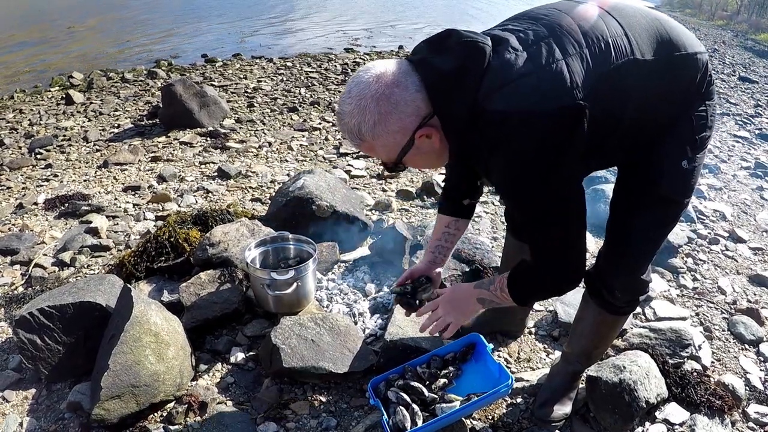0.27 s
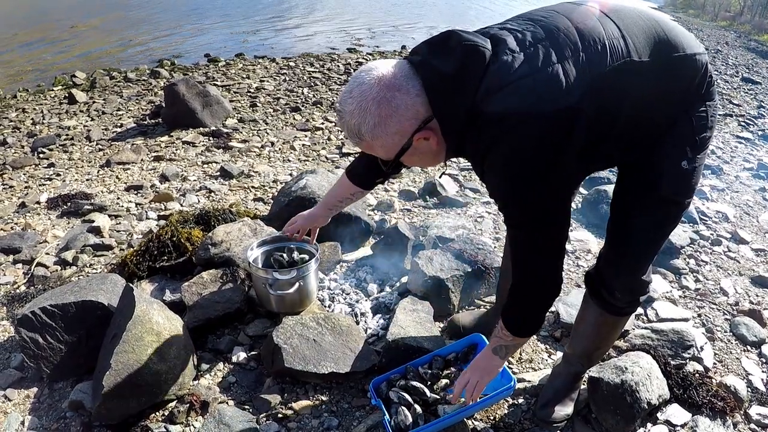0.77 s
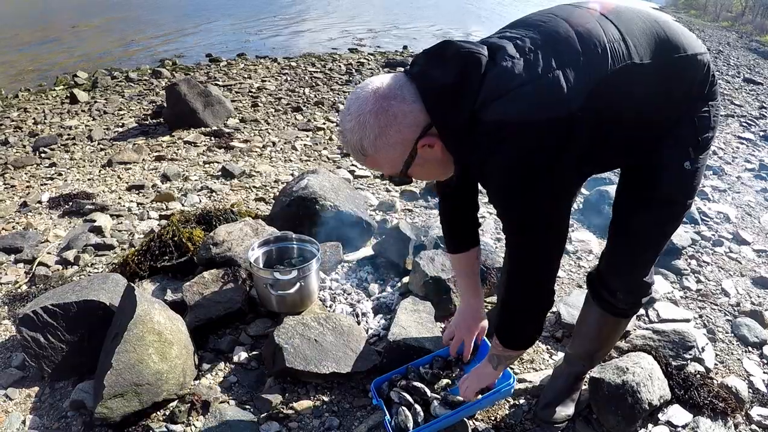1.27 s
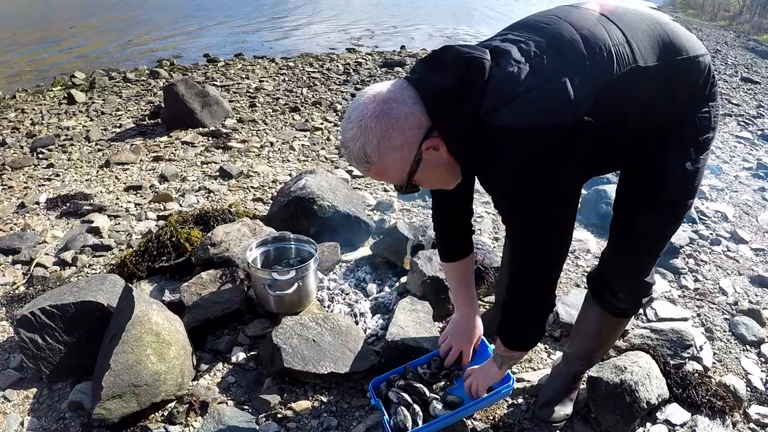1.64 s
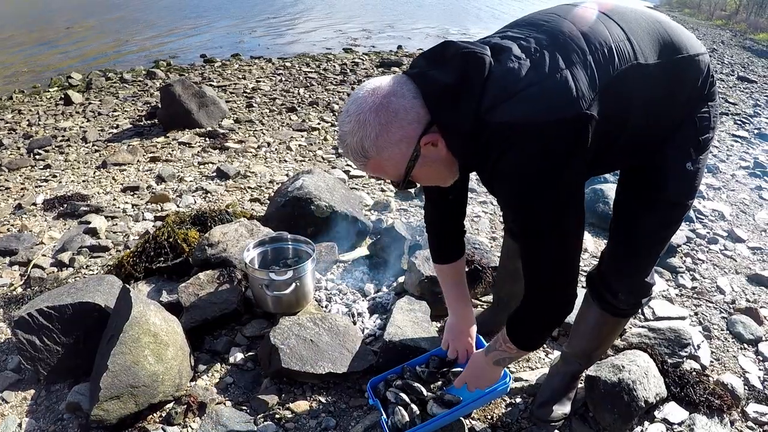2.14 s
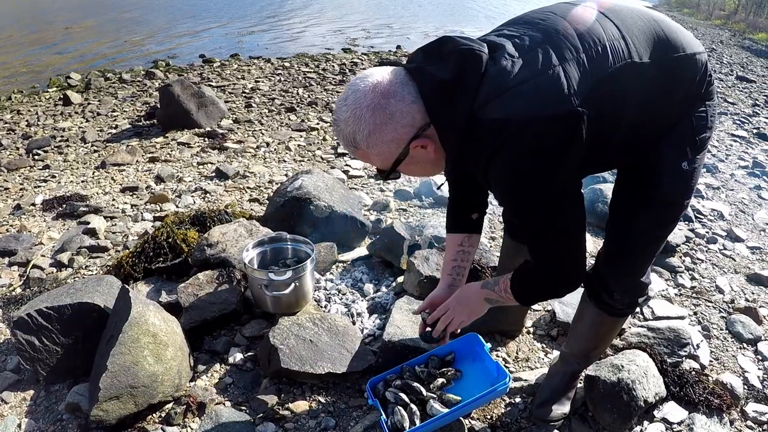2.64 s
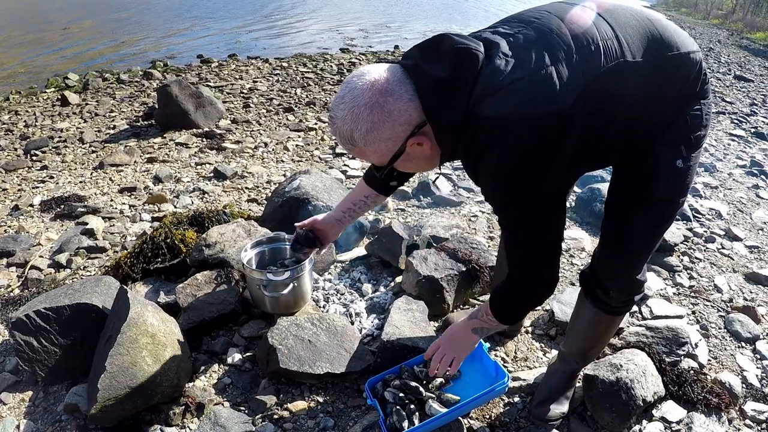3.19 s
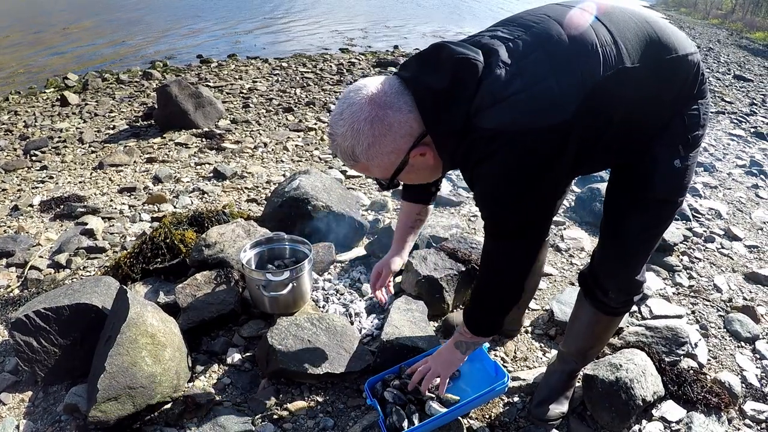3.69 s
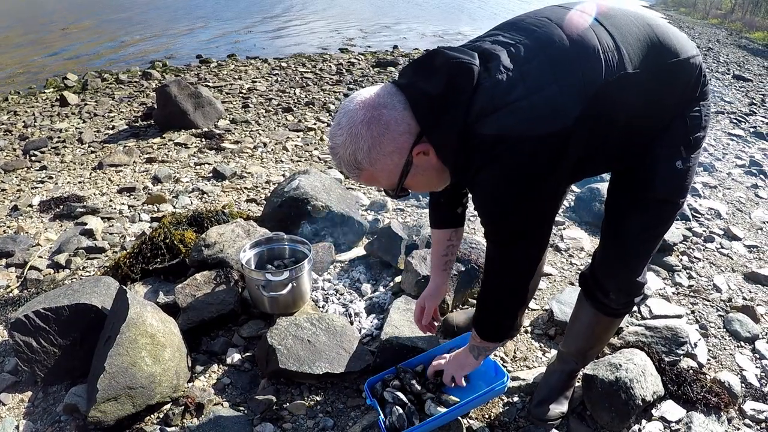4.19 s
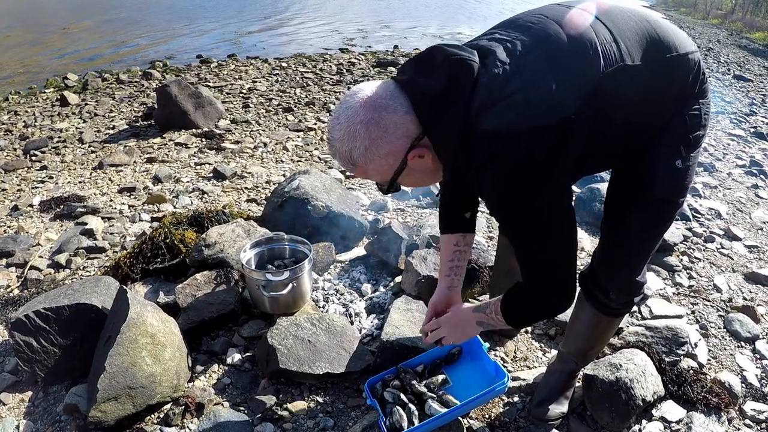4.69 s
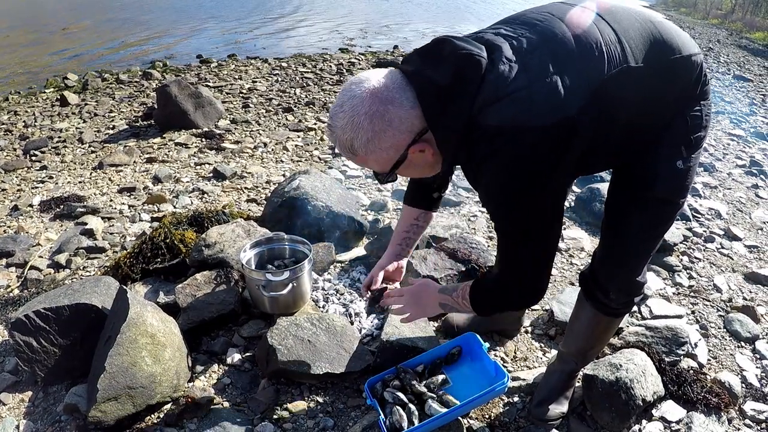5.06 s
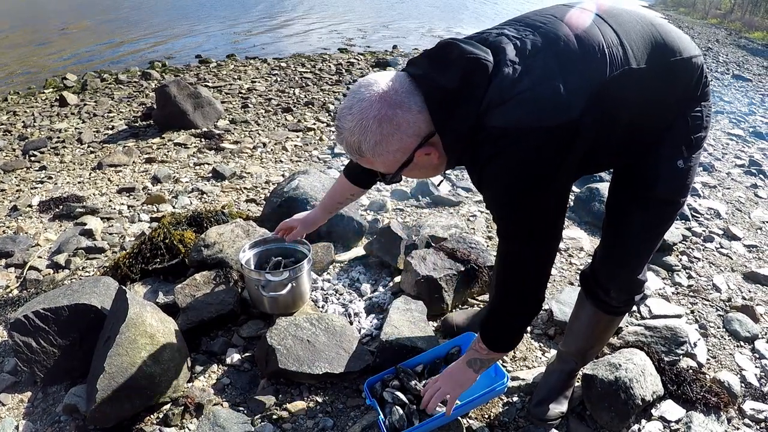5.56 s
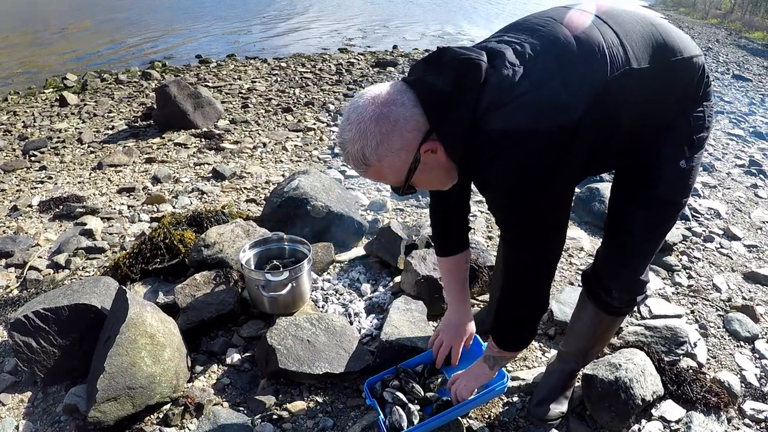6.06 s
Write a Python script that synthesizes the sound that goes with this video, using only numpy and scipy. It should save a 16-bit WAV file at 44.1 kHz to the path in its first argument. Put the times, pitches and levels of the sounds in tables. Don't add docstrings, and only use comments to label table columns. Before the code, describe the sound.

Mussel shells knock in a plastic tray and drop in three clattering bursts into a metal pot, over dying wind and a distant engine hum.

```python
import sys
import numpy as np
from scipy import signal
from scipy.fft import rfft, irfft, next_fast_len
from scipy.io import wavfile
from scipy.ndimage import uniform_filter1d

SR = 44100
rng = np.random.default_rng(int(sys.argv[2]) if len(sys.argv) > 2 else 0)


def master(y):
    cut = np.clip(np.atleast_2d(y).T, -1, 1)
    pcm = np.round(cut * 32767)
    wavfile.write(sys.argv[1], SR, pcm.astype(np.int16))


def boost(x):
    u = np.asarray(x, float) / 20
    return 10 ** u


N = 279153
T = np.arange(N) / SR
SIZE = next_fast_len(N)
HZ = np.maximum(np.fft.rfftfreq(SIZE, 1 / SR), 1)

# pitch_hz, left_lead_rad / pitch_hz, left_minus_right_db
POT_PHASE = [(300, 2), (1030, 0.76), (1380, 1.5), (1900, -1.9), (2400, -0.8), (3100, -0.84), (4800, 0.7),
             (6200, 0.5), (7600, 1.5), (8950, -2), (10300, 1.5)]
POT_BALANCE = [(500, -2), (1030, 3), (1380, -1.5), (1900, 14.5), (2400, 6), (3100, -1), (4800, 0),
               (6200, 7.5), (9000, -2.5), (10300, -17), (12000, 0)]
# pitch_hz, left_lead_rad / pitch_hz, left_minus_right_db
TRAY_PHASE = [(690, -0.13), (1030, 0.94), (1900, 0.13), (2400, -0.88), (3800, -0.42), (6200, -0.41),
              (9000, -1.4)]
TRAY_BALANCE = [(350, -1.5), (1030, -3.5), (1900, 2), (2400, 0.5), (3100, -5.5), (4800, -2), (6200, 5),
                (10000, -10)]
# pitch_hz, level_db, t60_s
TRAY_MODES = [(356, -6.5, 0.025), (550, -6.5, 0.21), (674, 1, 0.031), (796, 4.5, 0.018), (1134, 6.5, 0.021),
              (1250, 2, 0.011), (1750, -3.5, 0.029), (2220, -22, 0.017)]


def along(table, hz=HZ):
    table = np.array(table)
    return np.interp(np.log(hz), np.log(np.maximum(table[:, 0], 1)), table[:, 1])


def columns(table):
    s, *rest = np.transpose(table)
    return [np.interp(T, s, c) for c in rest]


def unit(x):
    return x / np.sqrt(np.mean(x ** 2))


def peak(x, db):
    return boost(db) * x / np.abs(x).max()


def shaped(x, gain):
    return irfft(rfft(x, SIZE) * gain, SIZE)[..., :N]


def coloured(table):
    return unit(shaped(rng.standard_normal(N), boost(along(table))))


def walk(rate):
    k = int(SR / rate)
    steps = np.repeat(rng.standard_normal(N // k + 1), k)
    return unit(uniform_filter1d(uniform_filter1d(steps, k), k)[:N])


def fading(t60, size):
    return np.exp(-np.log(1000) * T[:size] / max(t60, .003))


def swell(s, rise, fall, edge_db):
    distance = np.maximum((s - T) / rise, (T - s) / fall)
    return np.exp(edge_db * np.log(10) / 20 * distance)


def ring(modes, chance, scatter_db=3., damping=1.):
    detune = .016
    hz, db, t60 = np.transpose(modes)[:, :, None]
    t = T[:int(SR * t60.max() / damping)]
    size = boost(db + scatter_db * chance[:len(modes), None])
    hz = hz * (1 + detune * chance[::-1][:len(modes), None])
    decay = np.exp(-np.log(1000) * damping * t / t60)
    return np.sum(size * decay * np.sin(2 * np.pi * hz * t), axis=0)


def clatter(t60, chance, first=1.5):
    return np.r_[first * 10, chance[1:] ** 3] * fading(t60, size=len(chance))


def add(track, s, sound):
    i = int(s * SR)
    track[i:i + len(sound)] += sound[:N - i]


def ports(x, phase, balance, spread):
    half = np.exp(.5j * along(phase)) * boost(along(balance) / 2)
    pair = shaped(x, np.array([half, 1 / half]))
    tail = rng.standard_normal((2, 1500)) * np.exp(-T[:1500] / 0.0054)
    return pair + spread * signal.fftconvolve(x[None], tail, axes=1)[:, :N]


def wind():
    # time_s, steady_strength_db
    dying_down = [(0, -29.5), (1.2, -23), (2.4, -34.5), (3.4, -31.5), (4.3, -37), (5.2, -43.5),
                  (5.8, -47.5), (6.33, -53)]
    # pitch_hz, level_db
    rumble_colour = [(15, -7), (30, 3.5), (60, 4), (100, 3), (150, -9), (250, -52), (1000, -110)]
    buffet_colour = [(30, -33), (60, -7.5), (110, 0), (180, -2.5), (300, -11), (450, -20.5), (700, -29.5),
                     (1200, -51), (4000, -110)]
    # peak_s, length_s, rumble_db, buffet_db, left_minus_right_db
    gusts = [(0.061, 0.18, -44, -13.5, -2), (0.127, 0.062, -15.5, -12.5, 0), (0.317, 0.054, -20, -21, 19),
             (.45, 0.33, -29, -26, 8.5), (0.647, 0.11, -16.5, -19.5, 11), (0.766, 0.24, -30, -40, -7),
             (0.921, 0.091, -19.5, -9.5, 5), (1.012, 0.17, -17.5, -19, 5), (1.118, 0.11, -20.5, -12, 5),
             (1.214, 0.19, -41, -18, 9), (1.333, 0.2, -27, -13, 6), (1.625, 0.064, -16.5, -31, 1),
             (1.824, 0.12, -17.5, -22.5, -1.5), (1.982, 0.1, -18.5, -24, 4),
             (2.173, 0.21, -23, -24.5, -3.5), (2.292, 0.13, -24.5, -31, 12.5), (2.388, 0.019, -25, -26, 14),
             (1.714, 0.15, -32, -22.5, -2.5), (5.95, 0.38, -53, -38.5, -5), (2.53, 0.093, -26, -54, 12.5),
             (3.682, 0.08, -27, -32.5, 10), (4.643, 0.014, -23, -42, -15.5)]
    # pitch_hz, share
    cross = [(100, 0.012), (200, 0.079), (350, 0.16), (520, 0.36), (700, 0.29)]
    steady_db, = columns(dying_down)
    steady_buffet_db = -37.5 + 0.23 * (steady_db + 19.0)
    gust_edge_db = -15.5
    out = []
    for side in (1, -1):
        low, high = boost(2 * steady_db), boost(2 * steady_buffet_db)
        for s, length, low_db, high_db, pan_db in gusts:
            power = boost(side * pan_db) * swell(s, length, length, 2 * gust_edge_db)
            low = low + boost(2 * low_db) * power
            high = high + boost(2 * high_db) * power
        rumble = coloured(rumble_colour) * np.sqrt(low) * boost(1.5 * walk(14) + 4.5)
        buffet = coloured(buffet_colour) * np.sqrt(high) * boost(3.71 * walk(30) + 0.08)
        out.append(rumble + buffet)
    return np.array(out) - shaped(np.array(out[::-1]), along(cross))


def engine():
    # time_s, twice_firing_rate_hz, level_db
    running = [(0, 118.7, -26), (1.5, 119.6, -33), (2.5, 118.6, -31.5), (3.6, 119, -33), (4.2, 119.9, -35),
               (4.6, 120.8, -37), (5.2, 120.1, -38.5), (5.7, 121.3, -43.5), (6.33, 120.8, -49)]
    # multiple, level_db
    orders = [(1, -2.5), (2, 1), (2.5, -13.5), (3, -6), (4, -9), (5, -23.5), (6, -34)]
    hz, db = columns(running)
    turn = np.pi * np.cumsum(hz) / SR
    lead = np.array([[.05], [-.05]])
    out = 0
    for k, order_db in orders:
        level = boost(db + 3.0 + order_db + 0.78 * walk(6.2))
        out = out + level * np.sin(k * (turn + lead) + 0.33 * k * k)
    return out


def shore():
    # time_s, level_db
    wash = [(0, -50), (.2, -52.5), (.45, -48), (.8, -49.5), (1.3, -59.5), (1.7, -57), (2.0, -54.5),
            (2.3, -57.5), (2.6, -59.5), (4.0, -60), (5.3, -63.5), (5.8, -60.5), (6.33, -62)]
    # pitch_hz, level_db
    lapping = [(200, -25), (400, -2), (800, 1), (1400, -3), (2200, -12), (4000, -19.5), (9000, -88)]
    hiss = [(880, -29), (1500, -28), (1700, -1.5), (1830, -1), (2040, -13), (2200, -9.5), (3510, -11),
            (4370, -4.5), (5290, -8.5), (7190, -2), (7910, -7.5), (9300, -7), (10400, -14.5), (11300, -41),
            (13500, -34), (14700, -49)]
    # pitch_hz, level_db
    whines = [(4597, -85), (8629, -81.5)]
    # pitch_hz, correlation
    likeness = [(300, 0.045), (630, -0.34), (1400, -0.12), (3000, 0.45), (8000, -0.22)]
    wash_db, = columns(wash)
    lapping_db = -50.5 + 0.54 * (wash_db + 57.0)
    like = np.clip(along(likeness), -.95, .95)
    out = sum(boost(db + 11 + 1.0 * walk(8.9)) * np.sin(2 * np.pi * hz * T) for hz, db in whines)
    for colour, db in ((lapping, lapping_db), (hiss, wash_db)):
        mid = shaped(coloured(colour), np.sqrt(1 + like))
        side = shaped(coloured(colour), np.sqrt(1 - like))
        pair = np.array([mid + side, mid - side]) / np.sqrt(2)
        out = out + boost(db + 2.5 + 0.18 * walk(24)) * pair
    return out


def capsule_noise():
    # pitch_hz, level_db
    noise_colour = [(3000, -18), (7000, -2), (10500, 7), (13500, -3), (15000, -13)]
    return boost(-66.5) * np.array([coloured(noise_colour), coloured(noise_colour)])


def landings():
    # start_s, peak_db, low_ring_db, crack_db, clatter_t60_s
    shell_drops = [(0.822, -11.5, -3, -7, 0.26), (0.8416, -11.5, -21, -3.5, 0.073),
                   (1.0165, -24.5, -8, -11, 0.28), (1.1113, -39, 4, -2, 0.015),
                   (3.3595, -11.5, -9, -6, 0.11), (3.394, -18.5, 0, -3, 0.063),
                   (3.5014, -23.5, -11, -31, 0.06), (3.5476, -9, -26, -27, 0.021),
                   (3.5803, -35.5, 12, -30, 0.016), (5.5246, -14, -12, -8.5, 0.13),
                   (5.5313, -14.5, -30, 1, 0.021), (5.5688, -20, -6.5, -27, 0.1),
                   (5.593, -16.5, -4, -5, 0.12),
                   (.828, -15.5, 1, -5.5, 0.19), (0.8568, -20.5, 2.5, -26, 0.15),
                  (0.8716, -15.5, -6.5, -23, 0.26), (0.8865, -20.5, 0, -14, .048),
                  (.9552, -25, -9, -20, 0.27), (0.9788, -26.5, -2, -1.5, 0.22),
                  (3.3128, -32.5, -22, -0.5, 0.013), (3.4111, -25, 4.5, -23, 0.055),
                  (3.4176, -11.5, -10, -0.5, 0.15), (3.4426, -30, -29, 0, 0.16),
                  (3.473, -14, -20, -13.5, 0.03), (3.6128, -21.5, -7, -4.5, 0.092),
                  (3.6394, -28, -12, -16.5, 0.11), (3.6586, -31, -4, -31, 0.062),
                  (5.65, -33.5, 1, -27, 0.05)]
    # pitch_hz, level_db, t60_s
    pot_low = [(399, -16, 0.19), (597.6, -14, 0.16), (990, -6, 0.096), (1050, 1, 0.028),
               (1250, -21.5, 0.016), (1506, -3, 0.022)]
    pot_high = [(1720, -12, 0.018), (1980, -1, 0.03), (2800, -11, .022), (2470, 9, 0.062), (2510, 9, 0.075),
                (2940, -14, 0.029), (3510, -4, 0.05), (3730, 5, 0.053), (3990, -22, 0.051),
                (4310, -33, .03), (4930, -35, .08), (6300, -21, 0.02)]
    # pitch_hz, level_db
    crack_colour = [(600, -0.5), (1500, 2.5), (2700, 1), (3800, 5), (5200, -2.5), (6500, 2), (9000, -10),
                    (11000, -12.5), (14000, -27), (16000, -64)]
    out, crack = np.zeros(N), coloured(crack_colour)
    drops = shell_drops
    spots = rng.standard_normal((len(drops), 3, 24))
    showers = rng.standard_normal((len(drops), 6000))
    places = rng.random((len(drops), 24))
    for (s, db, low_db, crack_db, t60), spot, place, shower in zip(drops, spots, places, showers):
        contacts = clatter(0.79 * t60, shower)
        damping = max((0.046 / max(t60, .01)) ** 0.29, .95)
        shell_hz = 900 * (6800 / 900) ** ((np.arange(24) + place) / 24)
        shell = np.c_[shell_hz, along(crack_colour, shell_hz), np.full(24, .013)]
        # modes, spot, scatter between hits in dB, extra damping, level in dB
        bodies = ((pot_low, spot[0], 1.6, 1, low_db - 1.5),
                  (pot_high, spot[1], 5.5, 1.4, -15.5),
                  (shell, spot[2], 4., 1, -3.5))
        for modes, chance, scatter_db, slack, below_db in bodies:
            response = ring(modes, chance, scatter_db, slack * damping)
            add(out, s, peak(signal.fftconvolve(response, contacts), db + below_db))
        i = int(s * SR)
        grit = np.abs(uniform_filter1d(np.abs(contacts), size=60)) ** 0.99
        add(out, s, peak(crack[i:i + 6000] * grit, db + crack_db + 1.5))
    return out


def wall_rings():
    # start_s, peak_db, pitch_hz, t60_s
    rings = [(.843, -23.5, 2350, 0.12), (.862, -25, 3580, .05), (.886, -25, 3510, 0.15),
             (.981, -38, 3480, 0.11), (1.018, -32.5, 2485, 0.28), (1.016, -32, 3830, 0.34),
             (1.015, -32.5, 4550, .06), (3.36, -12.5, 2470, 0.017), (3.364, -14, 1016, 0.038),
             (3.395, -22, 2430, .12), (3.396, -21.5, 1497, .14), (3.396, -27, 3930, 0.066),
             (3.418, -21, 3510, 0.17), (3.42, -26.5, 4110, 0.27), (3.472, -20.5, 3940, 0.03),
             (3.478, -32.5, 1990, 0.17), (3.495, -44.5, 4920, 0.3), (3.615, -32.5, 990, 0.29),
             (3.422, -25.5, 2510, 0.16), (5.596, -24, 990, 0.11), (3.548, -20, 1250, 0.013),
             (3.615, -26.5, 3490, 0.13), (3.617, -30, 3990, 0.13), (5.531, -15.5, 3100, 0.011),
             (5.532, -16, 4580, 0.013), (5.595, -26, 2393, 0.057), (5.599, -25.5, 1493, 0.062),
             (5.595, -32, 3740, 0.24)]
    out = np.zeros(N)
    for (s, db, hz, t60), shower in zip(rings, rng.standard_normal((len(rings), 6000))):
        free_t60 = min(t60, .055)
        pair = ring([(hz, 0, free_t60), (1.018 * hz, -8, free_t60)], np.zeros(2))
        rubbing = clatter(t60, np.cbrt(shower) * np.abs(shower) ** 0.083, 0.28)
        add(out, s, peak(signal.fftconvolve(pair, rubbing), db - 1.0))
    return out


def pot():
    return ports(landings() + wall_rings(), POT_PHASE, POT_BALANCE, 0.027)


def slides():
    # start_s, rms_db, t60_s
    rushes = [(0.826, -29, 0.27), (0.982, -43, 0.14), (1.016, -44, .2), (3.361, -43, .1),
              (3.394, -33.5, .2), (3.42, -31, 0.26), (3.473, -41, 0.1), (3.614, -35.5, 0.22),
              (5.524, -30, 0.09), (5.57, -43, 0.075), (5.593, -38.5, 0.17)]
    # pitch_hz, level_db
    grind = [(700, -9), (1500, -0.5), (2800, 1), (4000, -0.5), (6500, -2), (10000, -13), (14500, -32)]
    force = np.zeros(N)
    for s, db, t60 in rushes:
        decay = np.exp(-np.log(1000) * np.maximum(T - s, 0) / max(t60, .02))
        force += boost(db) * (T >= s) * decay
    return ports(force * coloured(grind) * boost(1.9 * walk(250)), POT_PHASE, POT_BALANCE, .03)


def raking(taps):
    # peak_s, rise_s, fall_s, rattle_db, scrape_above_rattle_db
    strokes = [(1.14, 0.25, 0.43, -38, -5.5), (1.418, 0.25, 0.64, -40.5, -8), (1.66, 0.03, 0.03, -43, -4),
               (1.72, 0.12, 0.084, -49, 5.5), (2.03, 0.43, 0.16, -54, 13), (2.165, 0.026, 0.034, -47.5, 10),
               (2.24, 0.027, 0.074, -52, 7), (2.295, 0.035, 0.045, -42, -1),
               (3.977, 0.22, 0.051, -35, -10.5), (4.12, 0.12, 0.037, -34, -8),
               (4.29, 0.053, 0.05, -27, -14), (4.37, 0.052, 0.28, -38.5, -8),
               (5.78, 0.1, 0.055, -43.5, -2.5), (5.964, 0.049, 0.033, -31.5, -7.5),
               (6.09, 0.14, 0.16, -38.5, -2), (6.229, 0.015, 0.026, -46, -8)]
    # pitch_hz, level_db
    scrape_colour = [(400, -24), (800, -1.5), (1250, 0), (1600, -8), (2400, -8.5), (3800, -15),
                     (8000, -19.5), (14000, -51)]
    body = ring(TRAY_MODES[:6], np.array([0, 0, 0, 0, -1., 0]))
    rattle = unit(signal.fftconvolve(taps, body)[:N]) * boost(4.5 * walk(90))
    rustle = coloured(scrape_colour) * boost(2.7 * walk(120))
    grit = unit(shaped(taps * (rng.random(N) < .4), boost(along(scrape_colour))))
    scrape = 0.94 * rustle + 0.44 * grit
    out = np.zeros(N)
    for s, rise, fall, db, thin_db in strokes:
        stroke = boost(db - 3.5) * swell(s, rise, fall, -26)
        out += (rattle * boost(-9.5) + scrape * boost(thin_db)) * stroke
    return out


def knocks():
    # start_s, thud_peak_db, shell_pitch_hz
    dull_knocks = [(1.133, -22, 593), (1.237, -17.5, 500), (1.254, -25.5, 468), (1.575, -26.5, 520),
                   (1.666, -26, 635), (1.749, -32, 576), (2.287, -24, 580), (2.318, -27.5, 830),
                   (3.868, -34, 1230), (3.878, -28, 1130), (3.897, -38, 1050), (3.915, -21, 1160),
                   (3.967, -34, 1220), (4.07, -29, 544), (4.1, -32, 1120), (4.088, -33, 920),
                   (3.953, -30.5, 905), (4.17, -21, 614), (4.261, -22, 580), (4.273, -27, 636),
                   (4.303, -26, 570), (4.418, -46, 590), (4.444, -24, 740), (5.843, -23.5, 730),
                   (5.858, -29, 597), (5.968, -32.5, 494), (5.886, -46, 1240), (6.081, -34, 1160),
                   (5.983, -32, 600), (6.128, -27.5, 1190), (6.211, -34.5, 615), (6.227, -28.5, 550)]
    # start_s, thud_peak_db, shell_pitch_hz, click_db, click_pitch_hz
    edge_clicks = [(1.167, -41, 620, -48, 4970), (1.375, -36.5, 1680, -33.5, 3720),
                   (1.236, -31, 1100, -32, 1650), (2.29, -46, 1140, -36, 2600),
                   (4.376, -43, 600, -36, 2040), (1.446, -24.5, 516, -38, 4040),
                   (1.549, -31, 694, -37, 2500), (2.104, -16.5, 513, -21, 3040),
                   (2.146, -19.5, 670, -47, 1300), (2.1507, -17.5, 1237, -21, 2370),
                   (2.155, -22, 660, -20, 1630), (3.838, -41, 584, -33, 3730),
                   (3.8375, -34, 584, -28.5, 2350), (3.994, -35, 706, -37, 3830),
                   (4.364, -26.5, 1170, -37.5, 3720), (5.724, -35.5, 1250, -24.5, 4180),
                   (5.901, -30.5, 1250, -43, 3630), (5.941, -32, 1250, -39.5, 3940),
                   (6.011, -57, 816, -31.5, 4650), (6.011, -59, 816, -40, 2050),
                   (6.05, -27, 350, -39, 3000), (1.329, -31.5, 1250, -57, 2000),
                   (4.222, -33, 510, -52, 1500), (4.394, -30, 565, -46, 2300), (5.735, -30, 590, -37, 2000),
                   (5.926, -37, 1250, -53, 2000), (6.109, -42, 1200, -37, 3800),
                   (6.29, -39.5, 662, -60, 1500), (5.959, -27.5, 896, -44, 2600),
                   (6.234, -25.5, 1120, -33.5, 2500), (4.2729, -22, 1230, -40, 2430)]
    # pitch_hz, level_db
    click_colour = [(1000, -2), (2200, 7), (3000, -23), (4000, 1.5), (5200, -5), (7000, -14), (11000, -45),
                    (15000, -52)]
    out, noise = np.zeros(N), coloured(click_colour)
    hits = [(s, db, hz, db - 26.5, 1910) for s, db, hz in dull_knocks] + edge_clicks
    spots = rng.standard_normal((len(hits), 12))
    showers = rng.standard_normal((len(hits), 1500))
    for (s, db, hz, click_db, click_hz), spot, shower in zip(hits, spots, showers):
        contacts = np.convolve(clatter(.026, shower, 1.3), np.hanning(9))
        add(out, s, peak(signal.fftconvolve(ring([(hz, 0, .035)], spot), contacts), db - 7.0))
        add(out, s, peak(signal.fftconvolve(ring(TRAY_MODES, spot[2:]), contacts), db - 2.5))
        i = min(int(s * SR), N - 1000)
        burst = noise[i:i + 1000] * fading(0.021, size=1000)
        edge_modes = [(0.81 * click_hz, -5, .008), (click_hz, 0, .012), (1.07 * click_hz, -9, .008)]
        edge = ring(edge_modes, spot[4:])[:1000]
        add(out, s, peak(burst, click_db - 9.5))
        add(out, s, peak(np.convolve(edge, clatter(0.01, shower[:500], 0.96)), click_db + 1.0))
    return out


def rolling(taps):
    # peak_s, rise_s, fall_s, level_db, pitch_hz
    rolls = [(2.292, 0.017, 0.018, -31, 574), (2.322, 0.012, .03, -42.5, 1210),
             (3.885, 0.051, 0.04, -41.5, 690), (3.965, 0.078, 0.047, -34, 680),
             (3.965, 0.039, 0.075, -42, 1230), (4.09, 0.051, 0.082, -37, 555),
             (4.118, 0.041, 0.04, -32, 640), (4.112, 0.041, 0.026, -38.5, 1263),
             (4.29, 0.026, 0.049, -31.5, 645), (4.295, 0.038, 0.029, -42.5, 2460),
             (4.335, 0.03, 0.041, -43, 550), (4.385, .05, .05, -40, 555), (5.778, 0.03, 0.02, -37.5, 610),
             (5.775, 0.066, 0.034, -46.5, 1210), (5.826, 0.021, 0.024, -35.5, 600),
             (5.97, 0.027, 0.025, -31.5, 550), (6.062, 0.054, 0.09, -40, 350),
             (6.098, 0.027, 0.069, -44, 1270), (6.142, 0.029, 0.021, -32.5, 556),
             (6.18, 0.023, 0.032, -46.5, 550)]
    out = np.zeros(N)
    for k, (s, rise, fall, db, hz) in enumerate(rolls):
        i = int(s * SR) - 6000
        tone = ring([(hz, 0, .022)], np.zeros(1))
        hum = unit(signal.fftconvolve(taps[9000 * k:][:12000], tone)[:12000])
        t = T[i:i + 12000] - s
        bell_db = -26 * np.where(t < 0, t / rise, t / fall) ** 2
        add(out, i / SR, hum[:len(t)] * boost(db + bell_db))
    return out


def tray():
    taps = (rng.random(N) < 2500. / SR) * rng.standard_normal(N) * boost(2.13 * rng.exponential(size=N))
    return ports(raking(taps) + knocks() + rolling(taps), TRAY_PHASE, TRAY_BALANCE, 0.022)


def ticks():
    # start_s, peak_db, pitch_hz
    edge_ticks = [(1.2371, -33, 1750), (1.3738, -24, 1870), (2.15, -23, 1670), (3.8681, -41, 1880),
                  (3.8786, -39, 1800), (3.914, -37, 1520), (3.9444, -40, 1770), (3.9659, -31, 2280),
                  (4.0692, -42, 1520), (4.0986, -51, 1750), (4.1164, -43, 1840), (4.1694, -33, 2000),
                  (4.2607, -23, 1860), (4.3034, -47, 1560), (4.3924, -44, 1540), (4.4423, -23, 1890),
                  (4.4574, -41, 1980), (5.8132, -44, 1770), (5.8426, -28, 1800), (5.8584, -40, 1630),
                  (5.899, -30, 2380), (5.9404, -33, 1640), (5.9589, -33, 1920), (5.9824, -46, 1860),
                  (6.0477, -37, 1930), (6.0844, -52, 1530), (6.128, -33, 2380), (6.1494, -41, 1970),
                  (6.2332, -38, 1530)]
    t60 = 0.0065
    out = np.zeros(N)
    for (s, db, hz), chance in zip(edge_ticks, rng.standard_normal((len(edge_ticks), 300))):
        edge = ring([(0.5 * hz, -2, 1.5 * t60), (hz, 0, t60), (1.2 * hz, -4, 0.36 * t60)], chance[:3])
        add(out, s, peak(np.convolve(edge, clatter(0.0073, chance, 0.85)), db - 2.5))
    return ports(out, TRAY_PHASE, TRAY_BALANCE, .03)


def embers():
    # start_s, peak_db
    snaps = [
        (3.944, -44),
        (4.857, -47),
        (4.956, -25.5),
        (5.227, -48),
    ]
    # pitch_hz, level_db
    snap_colour = [(900, -40), (1800, 6), (2800, -3.5), (4500, 7.5), (9000, -7), (13000, -2), (16000, -24)]
    out, noise = np.zeros(N), coloured(snap_colour)
    for s, db in snaps:
        i = int(s * SR)
        add(out, s, peak(noise[i:i + 600] * fading(0.0043, size=600), db + 9.0))
    return ports(out, POT_PHASE, POT_BALANCE, 0.053)


def scene():
    surroundings = wind() + engine() + shore()
    shells = pot() + tray() + ticks() + slides()
    return surroundings + shells + embers() + capsule_noise()


def roll_off(x):
    return signal.sosfilt(signal.butter(12, 15300, fs=SR, output="sos"), x)


def record(dry):
    top = .98
    rounded = top * np.tanh(dry / top)
    lowpass = signal.ellip(6, .2, 18., 14750, fs=SR, output="sos")
    return roll_off(signal.sosfilt(lowpass, rounded))


dry = scene()
out = record(dry)
master(out)
```